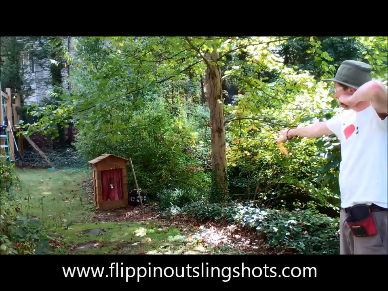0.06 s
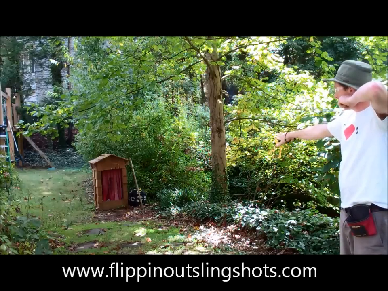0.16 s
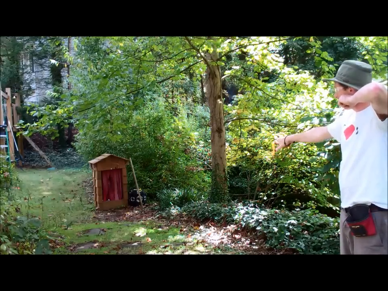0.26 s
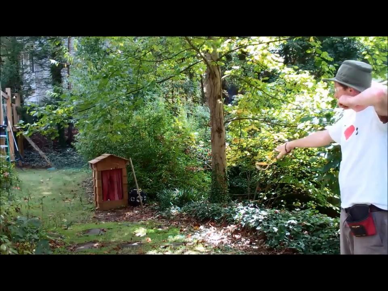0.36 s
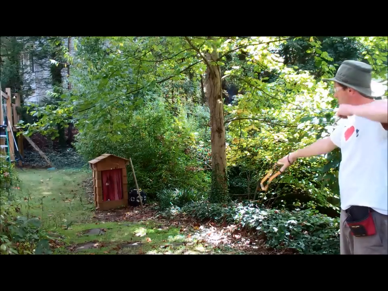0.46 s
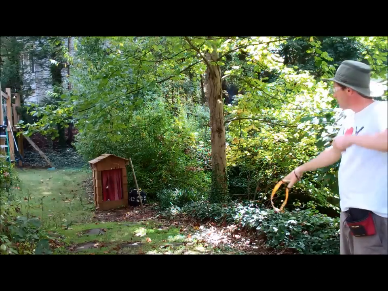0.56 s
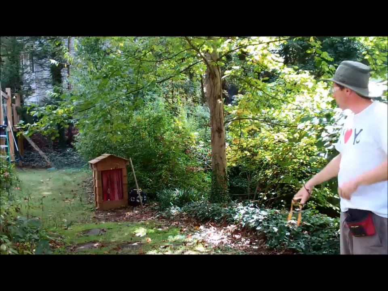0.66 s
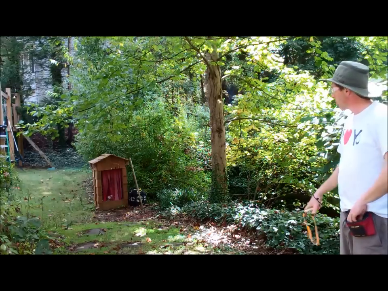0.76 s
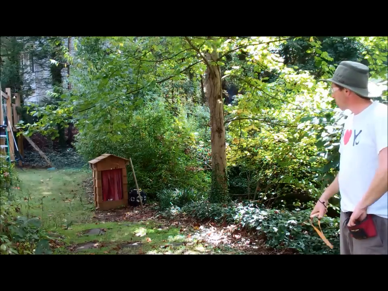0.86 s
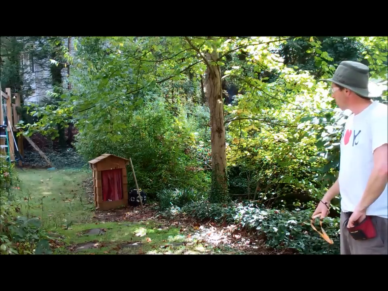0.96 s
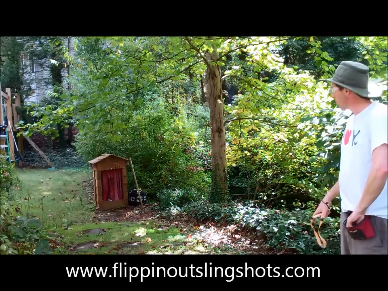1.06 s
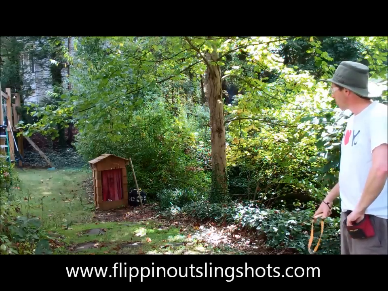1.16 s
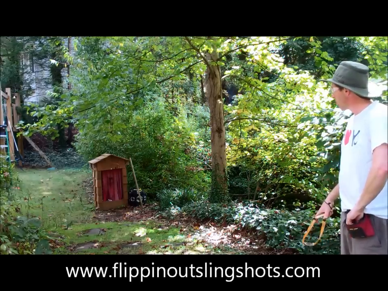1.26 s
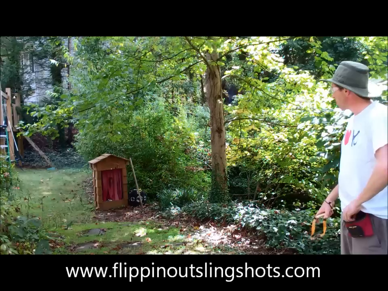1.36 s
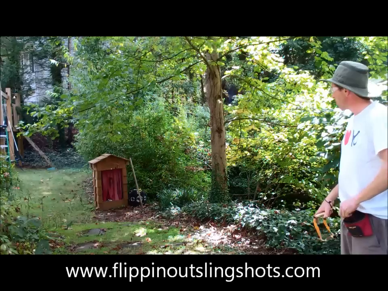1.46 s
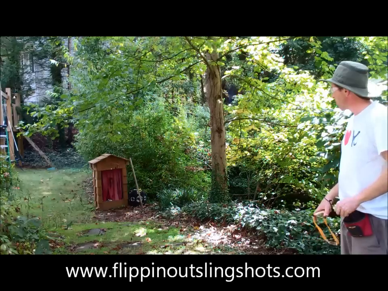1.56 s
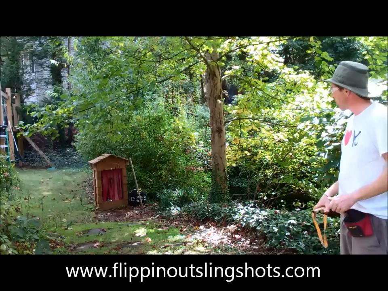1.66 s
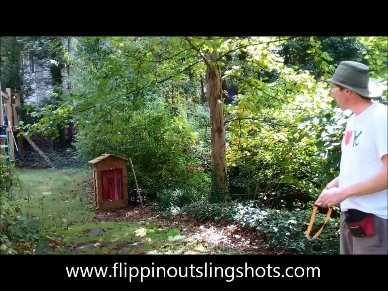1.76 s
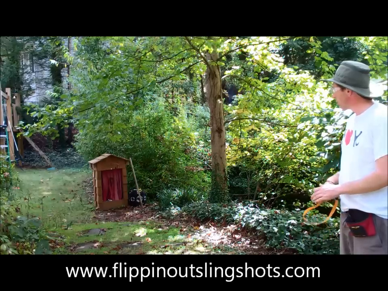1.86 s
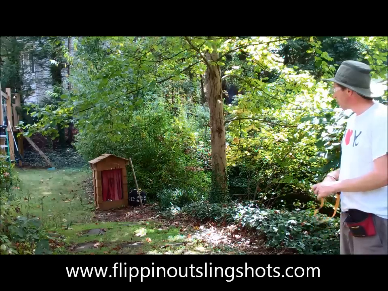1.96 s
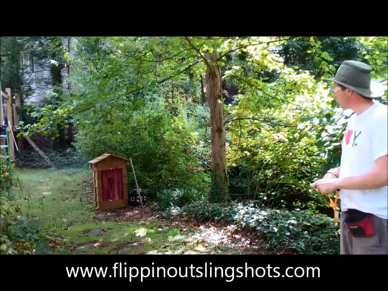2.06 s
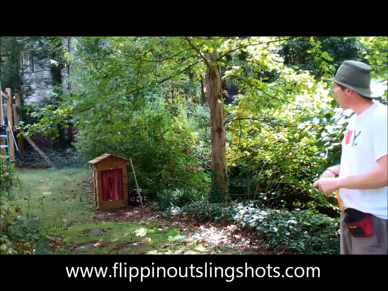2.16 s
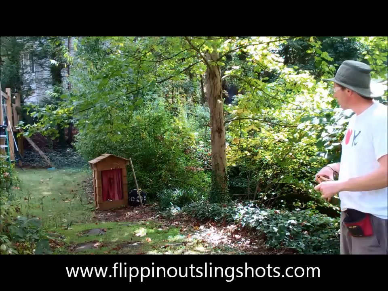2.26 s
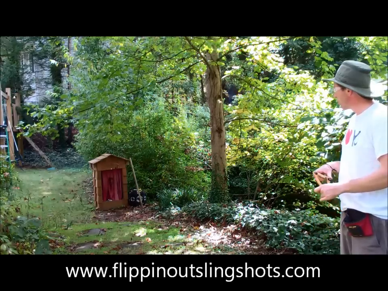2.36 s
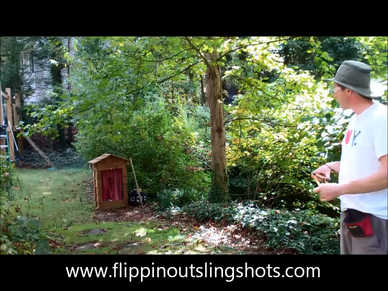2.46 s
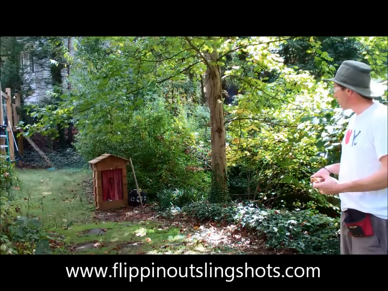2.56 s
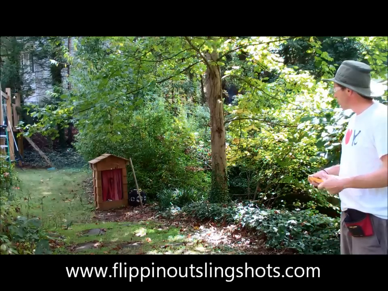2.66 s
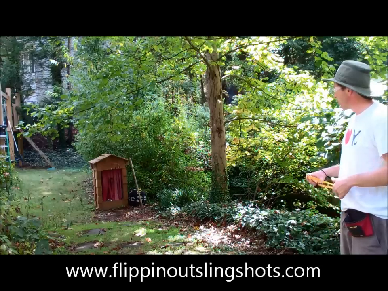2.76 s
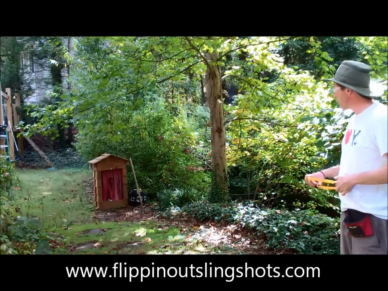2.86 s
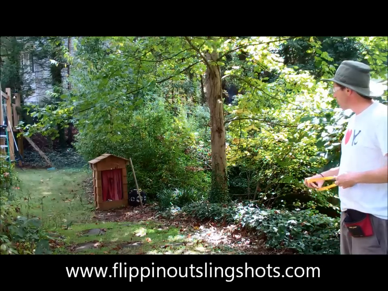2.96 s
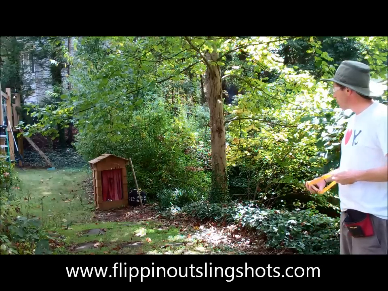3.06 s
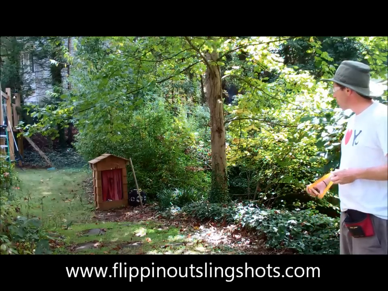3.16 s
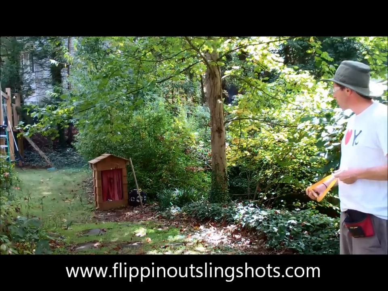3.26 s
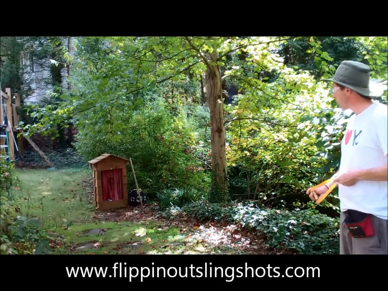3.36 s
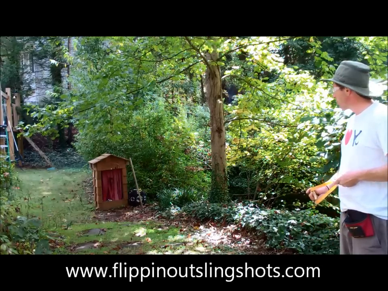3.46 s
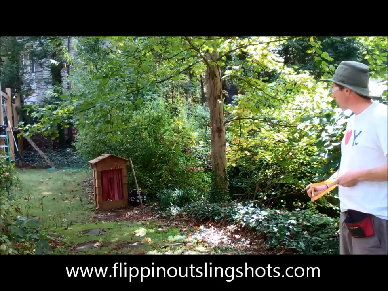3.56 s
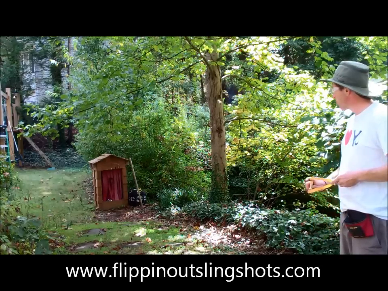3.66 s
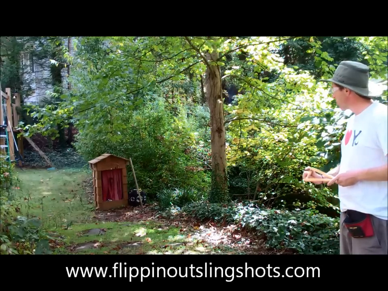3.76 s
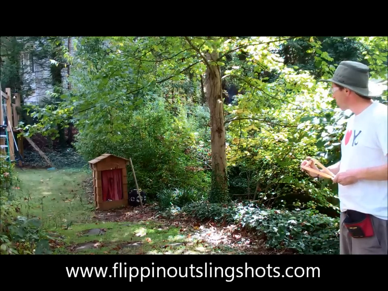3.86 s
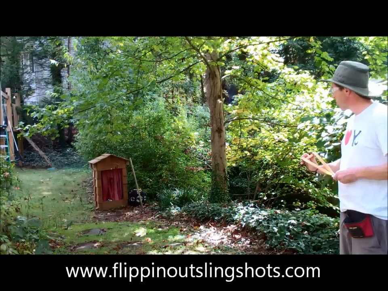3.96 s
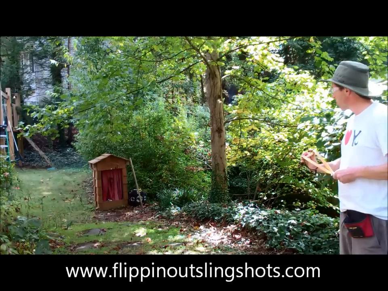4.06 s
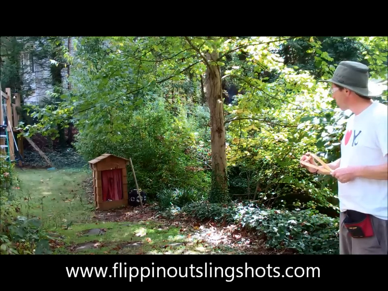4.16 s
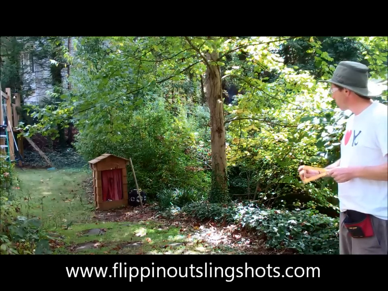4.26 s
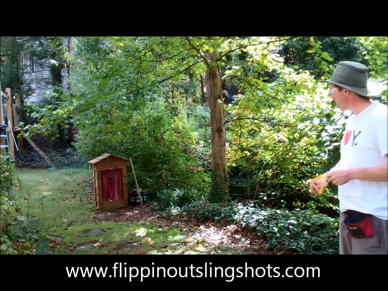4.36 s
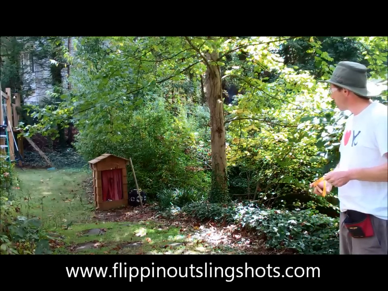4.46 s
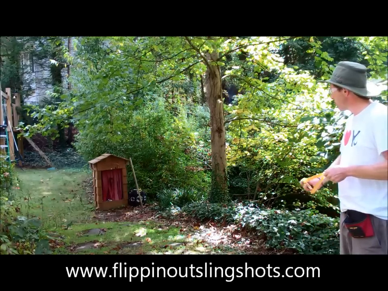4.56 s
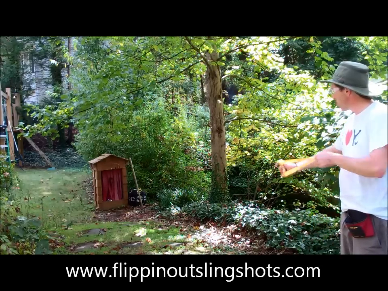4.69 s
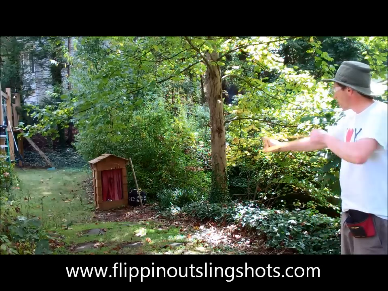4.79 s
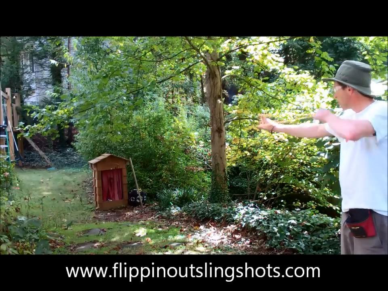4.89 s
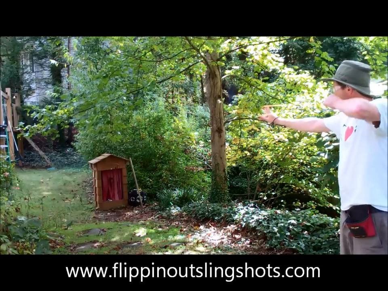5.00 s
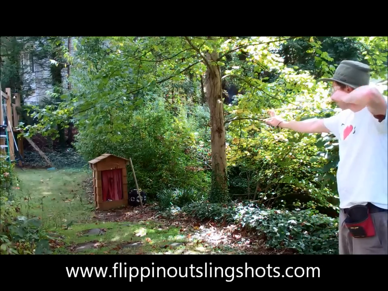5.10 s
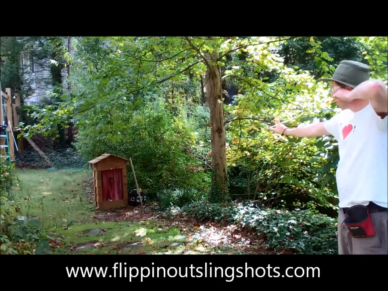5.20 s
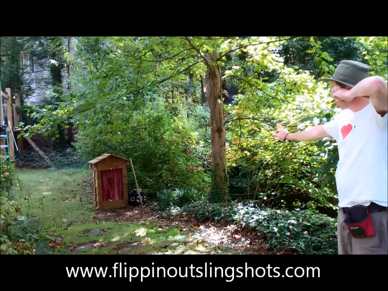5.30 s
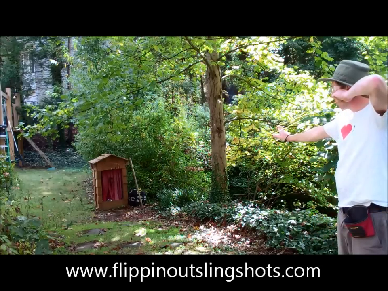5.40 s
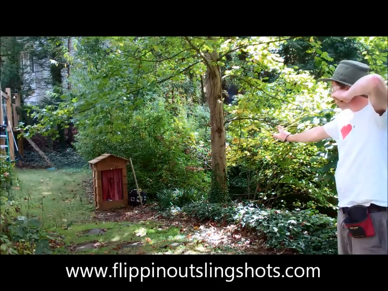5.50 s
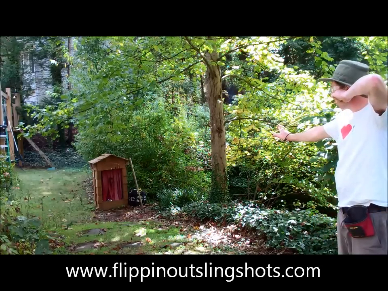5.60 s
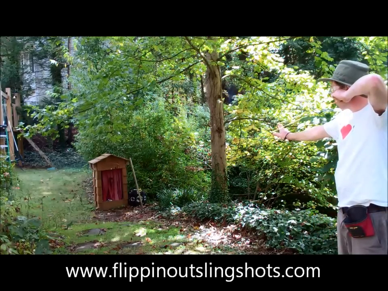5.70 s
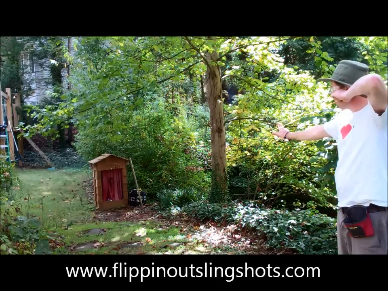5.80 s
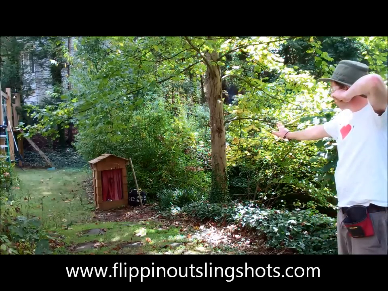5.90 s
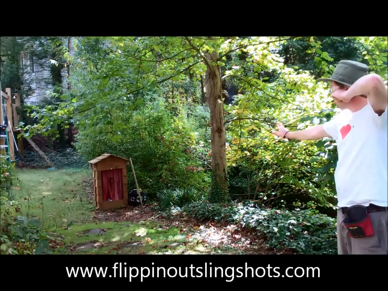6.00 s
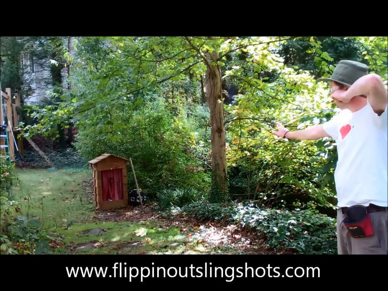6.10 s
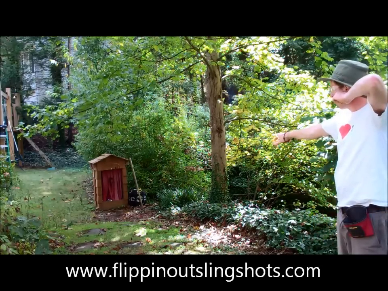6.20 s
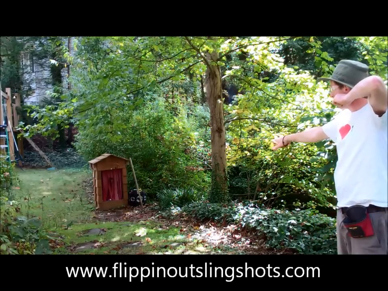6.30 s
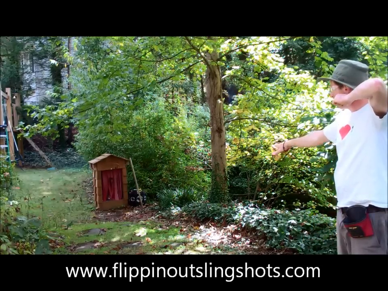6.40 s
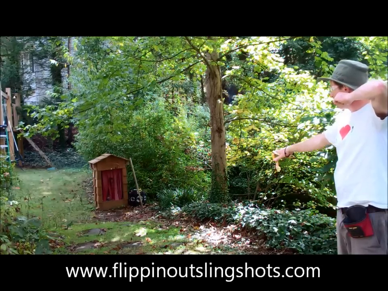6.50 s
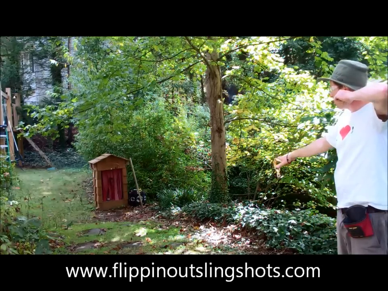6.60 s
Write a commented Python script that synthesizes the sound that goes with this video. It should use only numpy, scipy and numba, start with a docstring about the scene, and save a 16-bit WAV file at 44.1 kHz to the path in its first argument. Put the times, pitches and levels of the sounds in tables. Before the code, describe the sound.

A stereo camera stands near a slingshot shooter in a wooded garden. At once, from 0 to 0.07 s, slack rubber slaps in a tight, loud flurry, thuddy and hissing, slightly left. At 0.2 s a ball hits a thin can farther away: a sharp, crumpling crack with very short metallic ring, scattered by the trees. The can tumbles in a wooden box from 0.63 to about 1.1 s, strongest knocks near 0.87-1.0 s. Gain dips after the peaks, then recovers. A high, dry cicada ticks rapidly, slightly right, gradually faster, over a far insect chorus and soft traffic and leaves. Faint hoarse bird whistles droop at 1.4-2.6 s, with higher calls around 2.7-3.6 and 5 s. A low drone swells faintly around 4-5 s. At 6.1-6.2 s rubber slaps again; 6.35 s brings a drier, brighter crack, and 6.55 s one can knock as it ends.

```python
"""Slingshot in a wooded garden

Two shots: rubber bands slap near the camera (swelling grainy noise), a steel ball cracks on a can in a wooden box
(a pulse and noise ringing metal modes), and the can tumbles (knocks on metal and wood). Behind them a near cicada
ticks in threes, a far chorus (noise bands), far birds (wavering sines) and traffic and leaves (diffuse noise) go on.
Trees echo the hits and the birds; the camera ducks its gain after loud peaks.
"""
import sys
import numpy as np
from scipy import signal
from scipy.fft import rfft, irfft, next_fast_len
from scipy.io import wavfile
from scipy.ndimage import uniform_filter1d
from numba import njit

SR = 44100
rng = np.random.default_rng(int(sys.argv[2]) if len(sys.argv) > 2 else 0)


def store_wav(level_fs):
    """Save 16-bit WAV to argv[1]."""
    pcm = np.round(np.clip(np.atleast_2d(level_fs), -1, 1) * 32767)
    wavfile.write(sys.argv[1], SR, pcm.T.astype(np.int16))


N = 292809
MARK_S = 0.02  # a burst or click has its crest this far into its array

# Rubber slaps near the camera: t/s, crest level/dB before panning, swell/s, thud over the smack/dB
SLAPS = [(0.013, -29.5, 0.0015, 12), (0.017, -32, 0.0012, 13), (.032, -10.5, 0.0042, 0.5),
         (.036, -18.5, 0.00065, 4), (0.0596, -8.5, 0.00084, -11), (.065, -7.5, 0.0031, -4),
         (6.107, -35.5, .0005, 17), (6.159, -15, 0.0016, -16), (6.163, -23, .001, -4),
         (6.177, -14.5, 0.0034, 2.5), (6.203, -25, .0005, -20), (6.209, -6.5, 0.0026, -14),
         (6.214, -21.5, 0.0011, 6)]
SLAP_T60_S, SLAP_HISS_DB = 0.028, 8  # hiss over the smack
SLAP_PAN_DB = -2.1  # left minus right: the shooter stands to the right


def slaps():
    """Slack rubber whips fork and hand: left, right, and what the trees get, evened out over all directions."""
    out = np.zeros((3, N))
    for s, db, rise, thud_db in SLAPS:
        shape, grains = burst(rise, SLAP_T60_S, 2.0)
        crack = (shape + shape ** 5) / 2  # the first contact is sharper than the flutter after it
        slap = crack * level(rubber(grains, thud_db, SLAP_HISS_DB), db)
        to_trees = level(rubber(click(grains), thud_db, SLAP_HISS_DB), -1.2) * slap.std()
        left, right = slap * undb(SLAP_PAN_DB / 2), slap * undb(-SLAP_PAN_DB / 2)
        add(out, np.array([left, right, to_trees]), s - .019)
    return out


def rubber(x, thud_db, hiss_db):
    """Colour of a slap: a low thud, a smack in the middle and a high hiss."""
    thud = level(band(x, 780, 1950), thud_db)
    smack = signal.lfilter(*signal.butter(2, [2300, 8000], "bandpass", fs=SR), x)
    hiss = level(band(x, 11350, 7600), hiss_db)
    return thud + level(smack, 0) + hiss


# Ball on the can: t/s, level/dB of ring and crack each over half a second, crumpling t60/s
BLOWS = [(0.202, -22.5, 0.038), (6.348, -27.5, 0.012)]


def blows():
    """A sharp contact, then the wall crumples in clicks that ring the can; the second row goes to the trees."""
    out = np.zeros((2, N))
    for k, (s, db, t60) in enumerate(BLOWS):
        shape, grains = burst(0, t60, 4.8)
        impact = click(grains)
        hit = shape * level(grains, 0.5) + 0.43 * impact
        mode_dbs = np.array(CAN)[:, 2 + k]
        direct = level(can(hit, mode_dbs), 0) + level(band(hit, 6840, 15400), 0)
        # each mode beams its own way, so the trees return little of the ring
        to_trees = level(can(impact, mode_dbs), -7.0) + level(band(impact, 4200, 13600), 0.95)
        add(out, np.array([direct, to_trees]) * undb(db), s - .019)
    return out


# Modes of the can: f/Hz, t60/s (capped when played), level/dB at the first blow, level/dB at the second
CAN = [(1390, 0.0052, -8.5, -1), (1930, 0.01, -28, -21), (2250, 0.011, 0, -19), (2890, 0.004, -27, 0),
       (3500, 0.0078, -6, 5), (4020, 0.0061, -12, -24), (5240, 0.018, 2, -13), (6010, 0.0034, 6, -23),
       (6770, 0.014, -3, -14), (9260, 0.0021, -7, 7), (11600, 0.0033, -2.5, -1), (13300, 0.0021, -7, 18)]


def can(x, dbs, ring=1):
    """Thin dented metal: short broad modes, longer by the factor ring when the can is free."""
    total = 0
    for (hz, t60, *_), db in zip(CAN, dbs):
        width = np.log(1000) / (np.pi * ring * min(t60, .015))
        total = total + undb(db) * band(x, hz, width)
    return total


# The can tumbles in the box: t/s, crest level/dB, rise/s, t60/s, modes rung most f/Hz,
# their spread/octaves (6 dB down there), box wall over the metal/dB
TUMBLES = [(0.627, -40, .004, .1, 8000, 1.8, -4), (0.648, -36.5, 0.0022, 0.14, 8000, 1.8, -2),
           (.679, -41, 0.011, .25, 1300, .64, 3), (.737, -35.5, 0.0024, 0.13, 4040, .8, -18),
           (.786, -33, .004, 0.43, 3040, 0.25, -8.5), (.87, -17.5, 0.00044, 0.15, 2260, 1.23, -31),
           (.904, -25, 0.0017, 0.39, 2150, 1.05, -8), (1.006, -25, 0.00055, 0.12, 2580, 0.27, -6),
           (1.04, -39, .014, 0.2, 2600, 1.2, 7), (6.554, -24.5, .0008, 0.17, 3600, 0.81, -9.5)]
# Resonances of the wooden box, its wall and its hollow thud: f/Hz, width/Hz
WALL = (870, 120)
THUD = (157, 34)
THUD_DB = -5  # over the box wall
SCRAPE_DB, SCRAPE_DB_PER_OCTAVE = -1.5, 3.5  # scrape over the metal, more with a broader knock


def tumbles():
    """The can rattles against wood: its modes, the hollow of the box and a broad scrape."""
    out = np.zeros(N)
    rattle = undb(2.0 * walk(300))
    for s, db, rise, t60, hz, spread, wall_db in TUMBLES:
        shape, grains = burst(rise, t60, 1.8)
        x = grains * np.roll(rattle, -int(s * SR))[:len(grains)]
        wall = level(band(x, *WALL), wall_db)
        thud = level(band(band(x, *THUD), *THUD), wall_db + THUD_DB)
        # each knock lands elsewhere and favours other modes
        octaves = np.log2(np.array(CAN)[:, 0] / hz)
        mode_dbs = -6 * (octaves / spread) ** 2 + 2 * rng.standard_normal(len(CAN))
        metal = level(can(x, mode_dbs, 1.5), 0)
        scrape = level(band(x, 9000, 16000), SCRAPE_DB + SCRAPE_DB_PER_OCTAVE * spread)
        knock = shape + .6 * shape ** 6  # the first touch stands out of the rattle
        add(out, knock / knock.max() * level(metal + wall + thud + scrape, db), s - MARK_S)
    return out


# Colour of the trees' echo: f/Hz, level/dB
GARDEN = [(100, 3), (500, 5.5), (1200, 11.5), (5000, 9), (14000, 8)]
GARDEN_T60_S, GARDEN_DB = 0.27, -2.5
WOODS_T60_S, WOODS_DB = 1, -11.5  # the far trees answer longer and fainter


def echo(t60, db, size):
    """Trunks and leaves scatter a hit into a smooth tail."""
    t = np.arange(size) / SR
    tail = diffuse(GARDEN, size) * undb(-60 * t / t60) * (1 - np.exp(-t / 0.0029))
    return tail * undb(db) / np.sqrt(np.sum(tail ** 2) / 2)


# One near cicada speeds up: t/s, rate/(ticks per s)
CICADA = [(0, 62), (2, 62), (4.4, 67.5), (6, 71)]
# Its ticks, strong, strong, weak: level/dB
TICKS_DB = [-1, 0, -12]
# Resonances of its tymbal: f/Hz, width/Hz, relative level/dB
TYMBAL = [(6690, 600, 6), (13700, 900, -2)]
CICADA_DB, DB_PER_TICK_RATE = -61.5, 1  # level before the boost; louder as it hurries
# Many far cicadas: f/Hz, width/Hz, level/dB before flutter and swell
CHORUS = [(6160, 125, -61.5), (6667, 710, -48.5), (8380, 1130, -61), (13750, 1700, -62)]
# Swell of the chorus: t/s, gain/dB
SWELL = [(0, 3), (1.2, -1), (5, .4), (5.1, 3), (6, 2.5), (6.7, 5.5)]


def cicadas():
    """One insect ticks in groups of three; the far chorus blurs into bands."""
    t = np.arange(N) / SR
    rate = np.interp(t, *np.transpose(CICADA))
    phase = np.cumsum(rate) / SR
    pulse = np.exp(-((phase % 1 - .5) / .16) ** 2)
    accent = undb(np.array(TICKS_DB)[phase.astype(int) % 3])
    ticks = pulse * accent * rng.standard_normal(N)
    near = level(sum(level(band(band(ticks, hz, w), hz, w), g) for hz, w, g in TYMBAL), CICADA_DB)
    near = near * undb(DB_PER_TICK_RATE * (rate - rate.min()))
    noise = diffuse([(100, 0), (15000, 0)], N)  # flat colour
    far = 0
    for hz, width, db in CHORUS:
        far = far + level(band(band(noise, hz, width), hz, width), db) * undb(0.24 * walk(18))
    swell = undb(np.interp(t, *np.transpose(SWELL)))
    return near * undb([[-1.5], [1.5]]) + far * swell  # the near one sits to the right


# Far bird calls: start t/s, length/s, f/Hz, level/dB before fades and hoarseness
BIRDS = [(1.43, 0.37, 1460, -57), (1.75, 0.36, 1476, -53.5), (2.21, 0.35, 1494, -52.5),
         (2.73, .037, 4430, -61), (2.78, 0.5, 3500, -61), (3.16, .1, 3480, -67), (3.498, 0.057, 3980, -55),
         (3.537, .021, 2970, -59), (3.545, .018, 2200, -60), (4.95, .08, 3500, -62), (5.23, .07, 3500, -61)]


def birds():
    """Hoarse far whistles that waver in pitch and strength and droop at the end."""
    out = np.zeros(N)
    waver_hz, hoarse = 28 * walk(150), undb(2.5 * walk(60))
    for s, length, hz, db in BIRDS:
        u, i = np.linspace(0, 1, int(length * SR)), int(s * SR)
        pitch = hz * (1 - .012 * u ** 2) + waver_hz[i:i + len(u)]
        whistle = level(np.sin(2 * np.pi * np.cumsum(pitch) / SR), db)
        add(out, whistle * np.minimum(u / 0.037, 1) * (1 - u ** 1.3), s)
    return out * hoarse


# Colour of far traffic and leaves: f/Hz, relative level/dB per Hz
AIR = [(18, -52), (30, -11), (112, -2), (376, -4.5), (500, -4), (952, -6), (1810, -13.5), (5090, -12),
       (6590, -8), (7900, -10.5), (10800, -18), (13200, -16), (14300, -17)]
AIR_DB = -45.5  # before the slow swells
# A low drone near 105 Hz: t/s, level/dB
HUM = [(0, -67), (3.5, -68), (4, -58.5), (4.9, -59), (5.2, -71), (6.7, -72)]


def air():
    """Far traffic comes from the right; its bass swells on its own and a drone wavers in it."""
    x = later(level(diffuse(AIR, N), AIR_DB), 2.99)
    low = signal.lfilter(*signal.butter(1, 400, fs=SR), x)
    hum_gain = undb(np.interp(np.arange(N) / SR, *np.transpose(HUM)))
    hum = level(band(rng.standard_normal(N), 105, 6.1), 0) * hum_gain
    return low * undb(.9 * walk(4)) + (x - low) * undb(.7 * walk(6)) + hum


# Left-right likeness of diffuse sound: f/Hz, likeness (0-1)
ALIKE = [(60, 1), (130, 0.97), (290, 0.9), (640, 0.94), (1400, 0.53), (3090, 0.24), (6790, 0.7),
         (14900, 0.48)]
# Stereo tilt of diffuse sound: f/Hz, left minus right level/dB
TILT = [(60, 3), (110, -0.5), (200, 0.5), (380, -0.5), (700, 0.5), (1290, -0.5), (2370, -1.5), (4380, 0),
        (8090, -0.5), (14900, -3.5)]


def diffuse(colour, size):
    """Stereo noise of the given colour, arriving from all round."""
    n = next_fast_len(size)
    hz = np.arange(n // 2 + 1) * SR / n
    alike, tilt = np.clip(on_log(ALIKE, hz), 0, 1), on_log(TILT, hz) / 2
    spectra = rfft(rng.standard_normal((2, n)))
    mid, side = spectra * np.sqrt([1 + alike, 1 - alike]) * undb(on_log(colour, hz))
    pair = irfft([(mid + side) * undb(tilt), (mid - side) * undb(-tilt)], n)
    return level(pair[:, :size], 0)


def later(x, lag):
    """Stereo pair whose left port hears lag samples later, half the lag turned into each port's phase."""
    n = next_fast_len(x.shape[-1])
    turn = np.exp(-1j * np.pi * lag * np.arange(n // 2 + 1) / n)
    return irfft(rfft(x, n) * [turn, 1 / turn], n)[:, :x.shape[-1]]


def burst(rise, t60, grain_db):
    """Envelope that swells over rise s up to the mark and dies away, and steady grainy noise to go with it."""
    t = np.arange(int(.5 * SR)) / SR - MARK_S
    shape = np.where(t < 0, np.exp(t / max(rise, 1e-5)), undb(-60 * t / t60))
    grains = rng.standard_normal(len(t)) * undb(grain_db * rng.exponential(size=len(t)))
    return shape, grains


def click(like):
    """One pulse at the mark, as long an array as like."""
    return 1. * (np.arange(len(like)) == int(MARK_S * SR))


def walk(rate):
    """Random levels held 1 / rate s and slewed twice; spread near 1."""
    k = int(SR / rate)
    steps = np.repeat(rng.standard_normal(N // k + 1), k)
    return 1.26 * uniform_filter1d(uniform_filter1d(steps, k), k)[:N]


def band(x, hz, width):
    """One resonance, gain 1 at the centre."""
    return signal.lfilter(*signal.iirpeak(hz, hz / width, SR), x)


def undb(db):
    """Amplitude factor of a level in dB."""
    return 10 ** (np.asarray(db) / 20)


def level(x, db):
    """Scale x to an RMS level in dB."""
    return x * undb(db) / np.sqrt(np.mean(x ** 2))


def on_log(table, hz):
    """Read a table by frequency, straight lines on a log axis."""
    return np.interp(np.log(hz + 1), np.log(np.array(table)[:, 0]), np.array(table)[:, 1])


def add(out, x, s):
    """Mix x into out from s seconds on, trimmed at both ends."""
    i = int(round(s * SR))
    x, i = x[..., max(-i, 0):], max(i, 0)
    out[..., i:i + x.shape[-1]] += x[..., :N - i]


def scene():
    """Shots, can and birds, direct and through the trees, over cicadas and air."""
    near, hits, rest, calls = slaps(), blows(), tumbles(), birds()
    trees = echo(GARDEN_T60_S, GARDEN_DB, size=SR) + echo(WOODS_T60_S, WOODS_DB, size=SR)
    to_trees = near[2] + hits[1] + undb(-1.0) * rest + undb(-3.5) * calls
    tail = signal.oaconvolve(to_trees[None], trees, axes=1)[:, :N]
    beyond = (hits[0] + rest + calls) * undb([[-.6], [.6]])
    direct = later(near[:2], .9) + later(beyond, -.5)
    return direct + tail + cicadas() + air()


@njit
def duck(over_db, attack, hold, release):
    """Gain cut in dB: chases the overshoot, waits, then lets its aim go at a steady rate."""
    cut, aim, now, wait = np.empty(len(over_db)), 0., 0., 0.
    for i in range(len(over_db)):
        if over_db[i] >= aim and over_db[i] > 0:
            aim, wait = over_db[i], hold
        elif wait > 0:
            wait -= 1
        else:
            aim = max(aim - release, 0.)
        now += attack * (aim - now)
        cut[i] = now
    return cut


TOP_HZ = 14230  # nothing much passes above


def record(dry):
    """The camera: gain control with a limited range, hard ceiling, cut top."""
    loud_db = 10 * np.log10(uniform_filter1d(np.mean(dry ** 2, 0), size=88) + 1e-12)
    over_db = np.clip(0.85 * (loud_db + 21), 0, 11.5)
    cut_db = duck(over_db, 1 / (0.014 * SR), .2 * SR, 42 / SR)  # 14 ms attack, 0.2 s hold, 42 dB/s release
    wet = np.clip(dry * undb(-cut_db), -1, 1)
    low_pass = signal.ellip(14, .3, 70, TOP_HZ, fs=SR, output="sos")
    return np.clip(signal.sosfilt(low_pass, wet), -1, 1)


dry = scene()
out = record(dry)
store_wav(out)
```